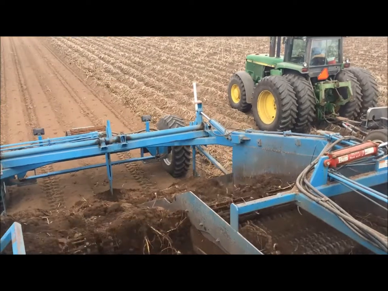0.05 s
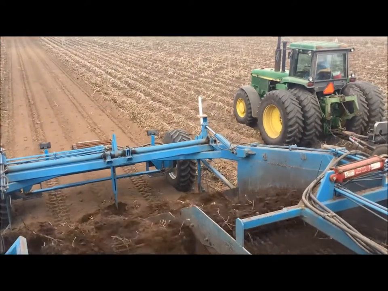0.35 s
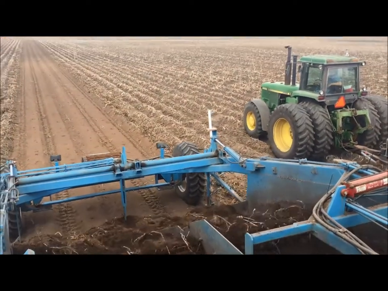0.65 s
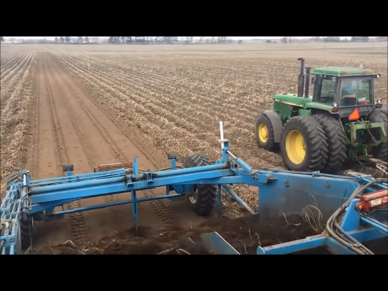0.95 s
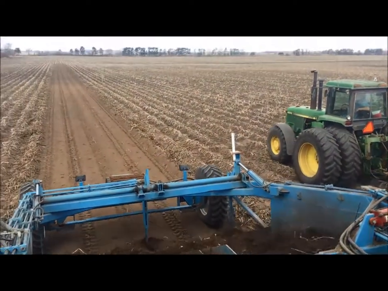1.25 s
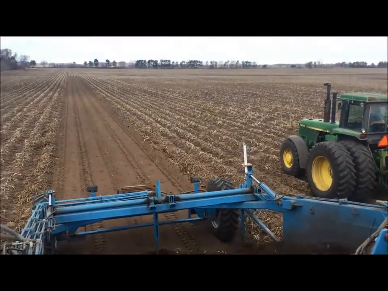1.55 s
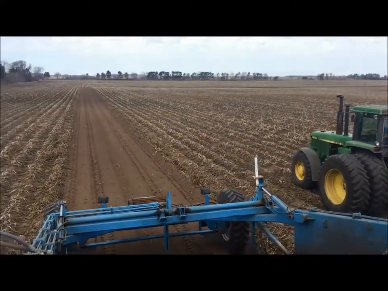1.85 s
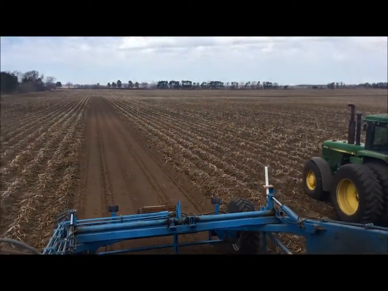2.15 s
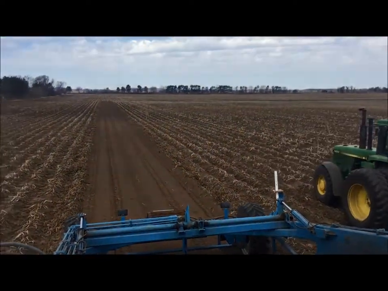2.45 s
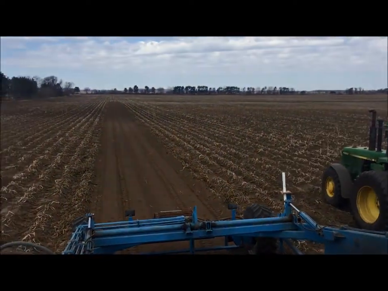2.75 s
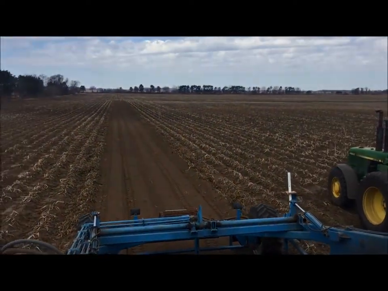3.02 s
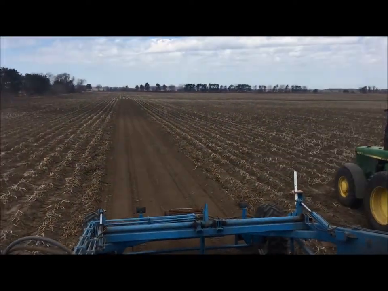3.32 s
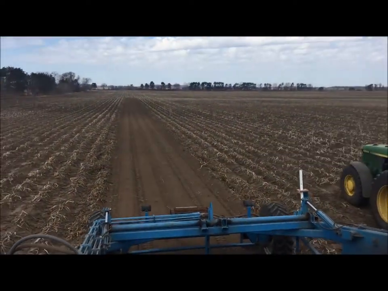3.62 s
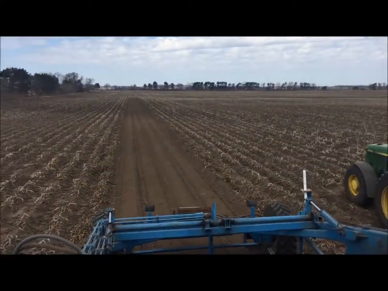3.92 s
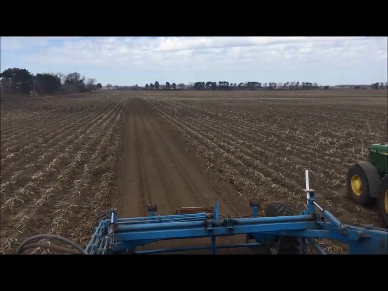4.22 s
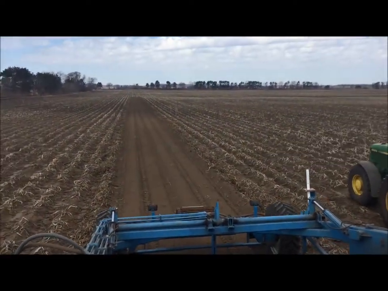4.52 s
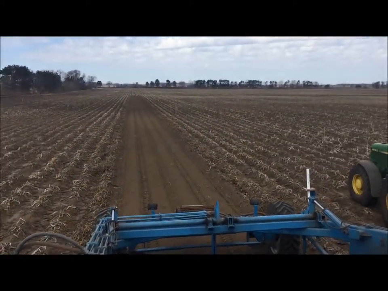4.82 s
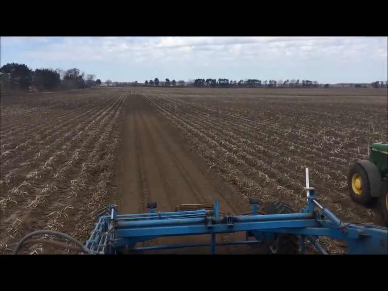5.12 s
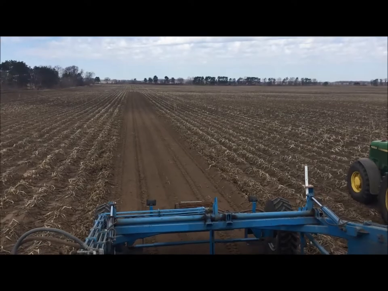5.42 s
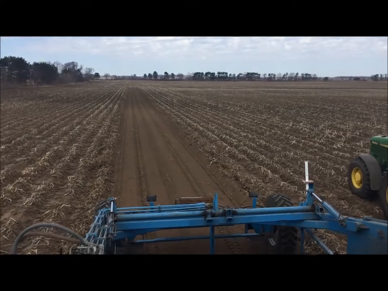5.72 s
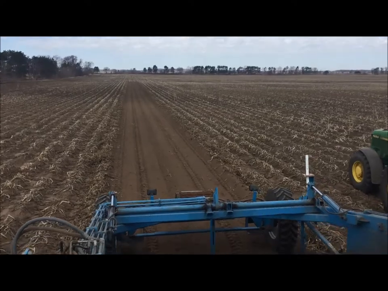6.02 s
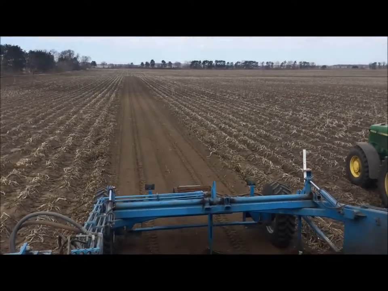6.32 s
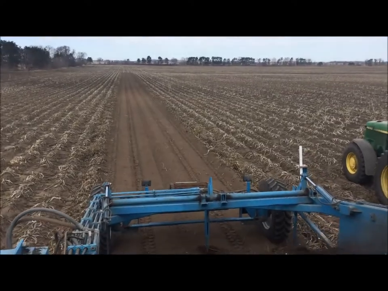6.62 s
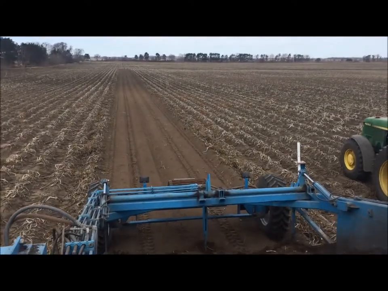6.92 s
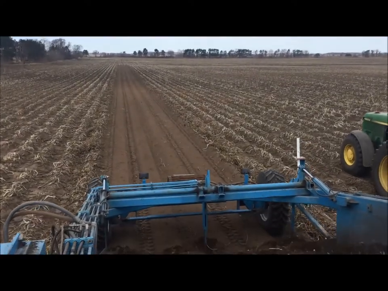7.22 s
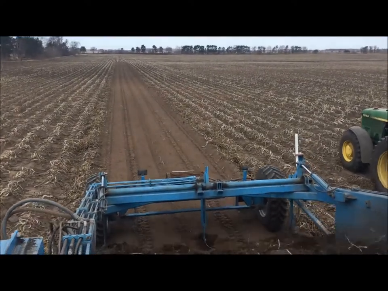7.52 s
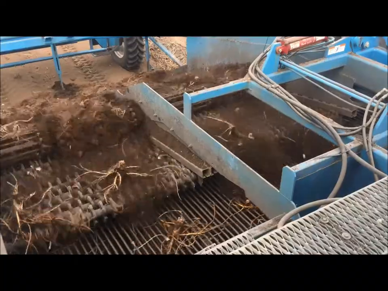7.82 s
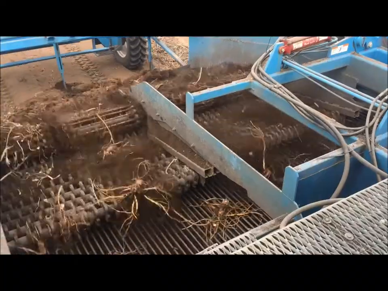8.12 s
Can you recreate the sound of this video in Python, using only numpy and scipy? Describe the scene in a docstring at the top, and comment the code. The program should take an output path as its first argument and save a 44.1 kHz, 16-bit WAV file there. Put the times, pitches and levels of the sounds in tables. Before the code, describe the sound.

From on board a root harvester working a field, a steady low diesel hum dominates. Under it run a dense metallic chain rattle, wavering pump and gear whines, a light hiss of sifting soil and a low rumble. Soft thuds come in the first few seconds, then one faint stone tick past the middle. After a split-second gap just before the end, the rattle and gear whine are more prominent.

```python
"""A governed six-cylinder diesel drones on a root harvester, heard from the deck.
It drives whining hydraulic pumps and gears. Sieve chains rattle, soil hisses through them,
the frame rumbles and bumps over the field, and one stone ticks on steel.
After a short silent break the same machine is heard with the sieves and gears louder."""
import sys
import numpy as np
from scipy import signal
from scipy.fft import rfft, irfft
from scipy.io import wavfile

SR = 44100
rng = np.random.default_rng(int(sys.argv[2]) if len(sys.argv) > 2 else 0)


def waveform_to_disk(signal):
    """Save audio, clipped to [-1, 1], as 16-bit WAV at the path in sys.argv[1]."""
    frames = np.transpose(np.atleast_2d(signal))
    scaled = np.clip(frames, -1, 1) * 32767
    samples = np.round(scaled).astype(np.int16)
    wavfile.write(sys.argv[1], SR, samples)


N = 359856
TIME_S = np.arange(N) / SR
BINS_HZ = np.arange(N // 2 + 1) * SR / N
CYLINDERS, FIRING_HZ = 6, 109.66


def undb(db):
    """Decibels to gain."""
    return 10 ** (np.asarray(db) / 20)


def unit(x):
    """Scale to rms 1."""
    return x / np.std(x)


def curve(rows):
    """Join (time [s], value) rows by straight lines."""
    return np.interp(TIME_S, *np.transpose(rows))


def walk(rate_hz):
    """Smooth random wander, rms 1, about rate_hz changes a second."""
    spectrum = rfft(rng.standard_normal(N))
    return unit(irfft(spectrum / (1 + (2 * BINS_HZ / rate_hz) ** 4), N))


def colour(x, points):
    """Filter by (frequency [Hz], gain [dB]) rows; rms 1."""
    hz, db = np.transpose(points)
    gain_db = np.interp(np.log(np.maximum(BINS_HZ, 1)), np.log(hz), db)
    return unit(irfft(rfft(x) * undb(gain_db), N))


def tone(turns):
    """Sine of rms 1, phase in turns."""
    return np.sqrt(2) * np.sin(2 * np.pi * turns)


def impacts(rate_hz, spread_db, ring_s):
    """Random unequal blows, each a dying noise burst; rms 1."""
    hits = rng.random(N) < rate_hz / SR
    blows = hits * undb(spread_db * np.clip(rng.standard_normal(N), -2, 2))
    power = signal.lfilter([1], [1, -np.exp(-2 / (ring_s * SR))], blows ** 2)
    return unit(np.sqrt(power) * rng.standard_normal(N))


def diesel(cycles):
    """Firing harmonics boom in step; unequal cylinders add wavering orders between them."""
    # exhaust and block: (multiple of the four-stroke cycle, level [dB])
    orders = [(3, -42.5), (4, -50.5), (5, -41.5), (6, -14), (7, -39), (8, -40), (9, -34), (10, -47),
              (11, -48), (12, -40), (14, -48), (15, -62), (16, -38), (17, -53), (18, -35.5), (20, -45.5),
              (22, -44.5), (24, -45.5), (27, -61), (30, -49), (34, -53.5), (37, -57), (39, -48.5),
              (40, -67), (42, -50), (44, -48), (51, -56), (57, -48), (58, -67), (66, -49)]
    wavers = [walk(2.8) for _ in range(CYLINDERS)]
    out = 0
    for i, (order, db) in enumerate(orders):
        waver_db, phase_turns = (1.6, rng.random()) if order % CYLINDERS else (.25, 0)
        out += undb(db + waver_db * wavers[i % CYLINDERS]) * tone(order * cycles + phase_turns)
    return out


def main_pump(firings, tilt):
    """Piston ripple beats slowly with the third firing harmonic; screened as the tilt grows."""
    # ripple overtones: (multiple of the stroke rate, level [dB])
    overtones = [(2, -43.5), (3, -42), (4, -51)]
    strokes = 2.99474 * firings + .097
    screened = np.minimum(tilt / .46, 1)
    ripple_db = -22 - 6 * screened + .61 * walk(8.7)
    out = undb(ripple_db) * tone(strokes)
    for order, db in overtones:
        out += undb(db + 2.4 * walk(6.5)) * tone(order * strokes + .051 * walk(7.6))
    return out


def second_pump(shaft_s, stroke_hz=393.4, flutter_db=1.8):
    """A hydraulic pump whines with a flutter, mostly on its octave."""
    # whine at the octave: (time [s], level [dB])
    octave_levels = [(0, -37), (3.9, -37.5), (4.45, -34), (4.8, -43), (5.2, -37), (6.25, -32.5),
                     (6.65, -35.5), (7.1, -32.5), (7.6, -38)]
    strokes = stroke_hz * shaft_s + .02 * walk(6)
    octave_db = curve(octave_levels) + flutter_db * walk(8.9)
    fundamental_db = -43 + 3.6 * walk(13)
    return undb(octave_db) * tone(2 * strokes) + undb(fundamental_db) * tone(strokes)


def gears(shaft_s, tilt, mesh_hz=2230):
    """Meshing teeth ring roughly; screened unless faced directly."""
    level_db = -45 + 10 * tilt ** 6 + 3.7 * walk(25)
    return undb(level_db) * tone(mesh_hz * shaft_s + .11 * walk(12))


def sieves(cycles, tilt, shaker_hz=2.9):
    """Chain links churn on steel, pulsing faintly with the engine; soil sifts through the shaken web."""
    # ring of chains and side plates: (frequency [Hz], gain [dB])
    steel_spectrum = [(200, -28), (450, -6.5), (560, -4), (640, -2), (740, -1.5), (920, 0), (1350, -6.5),
                      (1600, -5), (1800, -5.5), (2300, -5.5), (2700, -10.5), (4200, -19), (7000, -33),
                      (16000, -42)]
    # hiss of sifting soil, coloured by the microphone's notches near 4.9 and 10.4 kHz:
    # (frequency [Hz], gain [dB])
    notched_hiss = [(1000, -7), (4000, -3), (4900, -6), (5400, 5), (6700, 2), (7600, -5), (9500, -4.5),
                    (10400, -22), (11200, -9.5), (16000, -11)]
    throb = 1 + .04 * np.cos(2 * np.pi * cycles)
    links = colour(throb * impacts(rate_hz=5000, spread_db=.5, ring_s=.008), steel_spectrum)
    soil = colour(impacts(rate_hz=9000, spread_db=.5, ring_s=.0027), notched_hiss)
    shaker_db = .11 * tone(shaker_hz * TIME_S + .27)
    return undb(-28 + 3.5 * tilt + shaker_db) * (links + undb(-19.5) * soil)


def frame(rise_s=.02):
    """The frame rumbles on its tyres and thuds softly over uneven ground."""
    # frame and tyre rumble: (frequency [Hz], gain [dB])
    rumble_spectrum = [(20, -28), (35, -16), (45, -21), (56, -12), (72, -2), (95, 3), (135, 0.5),
                       (180, 0.5), (240, -6.5), (315, -2.5), (400, -11), (480, -18.5), (900, -32),
                       (3000, -50)]
    # ground bumps: (time [s], peak [dB], pitch [Hz])
    bumps = [(.10, -27.5, 58), (.48, -31, 74), (1.145, -27, 62), (1.71, -28, 54), (2.63, -24.5, 62.4)]
    out = undb(-28.5 + .62 * walk(12)) * colour(rng.standard_normal(N), rumble_spectrum)
    for start_s, peak_db, hz in bumps:
        age_s = np.maximum(TIME_S - start_s, 0)
        swell = age_s / rise_s
        out += undb(peak_db) * swell * np.exp(1 - swell) * np.sin(2 * np.pi * hz * age_s)
    return out


def stone(start_s=5.747, level_db=-40, decay_s=.0065):
    """One small stone ticks brightly against the steel."""
    age_s = np.maximum(TIME_S - start_s, 0)
    tick = colour(rng.standard_normal(N), [(3000, -27), (9000, 0), (16000, -6)])
    return undb(level_db) * (age_s > 0) * np.exp(-age_s / decay_s) * tick


def scene():
    """One governed speed turns engine, pumps and gears; the microphone's tilt sets the balance."""
    # microphone direction: (time [s], tilt [0 facing the field, 1 down at the sieves])
    tilt_path = [(0, 0.54), (1.1, .5), (1.9, 0.26), (3, 0.2), (3.6, 0.076), (5.5, .02), (6.3, 0.12),
                 (7.66, 0.092), (7.72, 0.93)]
    tilt = curve(tilt_path)
    governor_wander_hz = .0805 * walk(1)
    firings = np.cumsum(FIRING_HZ + governor_wander_hz) / SR
    cycles = firings / CYLINDERS
    shaft_s = firings / FIRING_HZ  # time as the drive shaft counts it
    drive = diesel(cycles) + main_pump(firings, tilt) + second_pump(shaft_s) + gears(shaft_s, tilt)
    return (drive + sieves(cycles, tilt) + frame() + stone())[None]


def record(dry):
    """The sound breaks off for 55 ms; the top treble is cut."""
    break_start_s, break_end_s, cutoff_hz = 7.6665, 7.7215, 15800
    audible = (TIME_S < break_start_s) | (TIME_S > break_end_s)
    fade = signal.windows.hann(32)
    gate = np.convolve(audible, fade / fade.sum(), "same")
    low_pass = signal.ellip(10, .1, 80, cutoff_hz, fs=SR, output="sos")
    return signal.sosfilt(low_pass, dry * gate)


dry = scene()
out = record(dry)
waveform_to_disk(out)
```